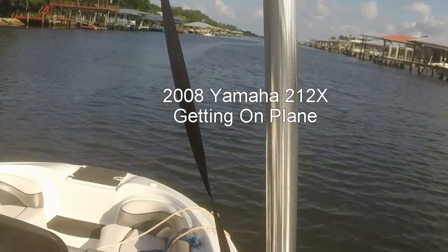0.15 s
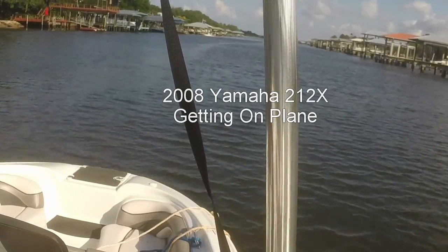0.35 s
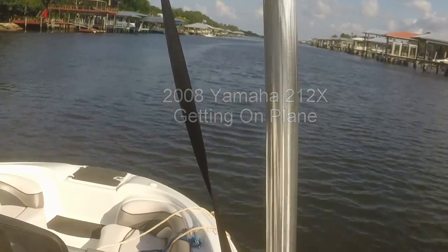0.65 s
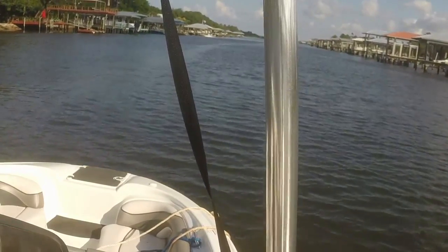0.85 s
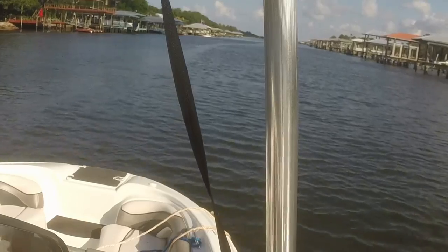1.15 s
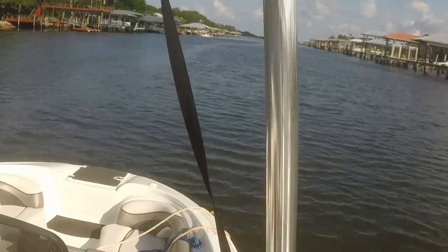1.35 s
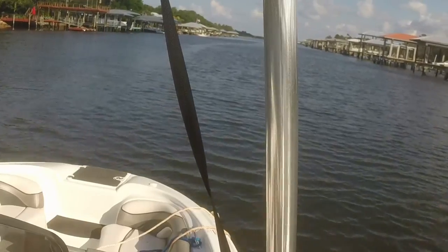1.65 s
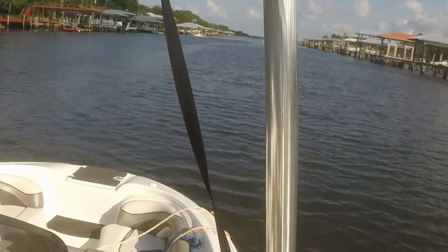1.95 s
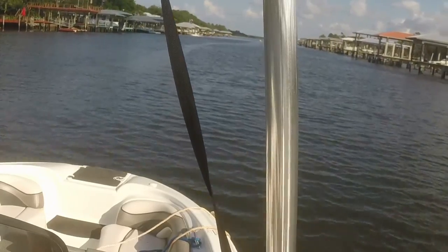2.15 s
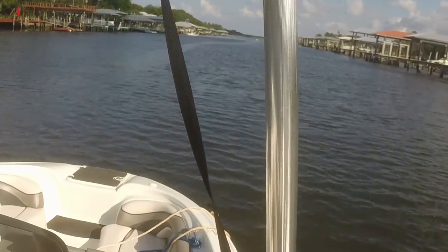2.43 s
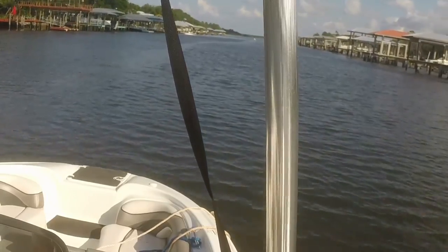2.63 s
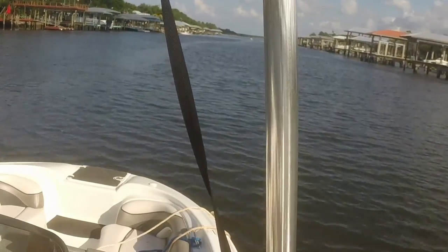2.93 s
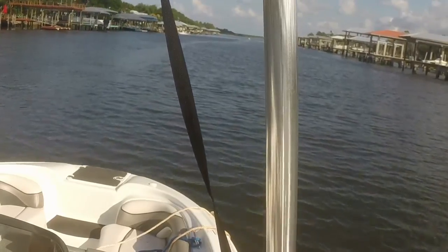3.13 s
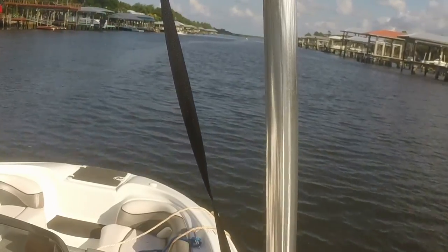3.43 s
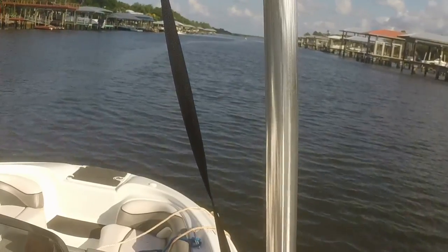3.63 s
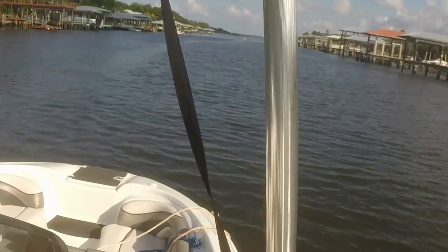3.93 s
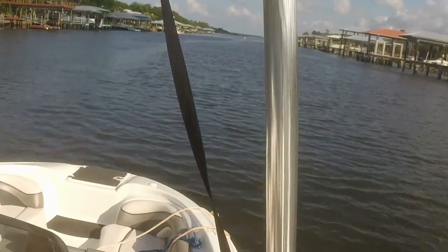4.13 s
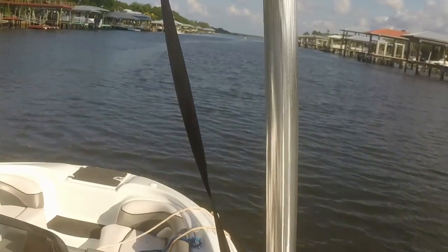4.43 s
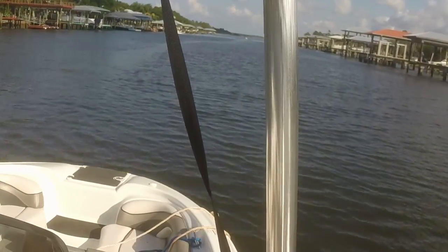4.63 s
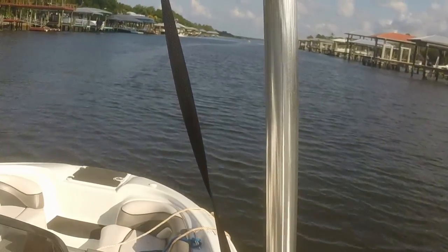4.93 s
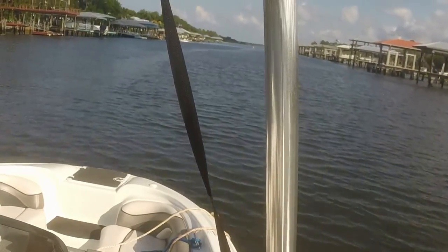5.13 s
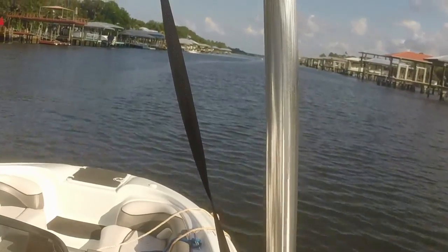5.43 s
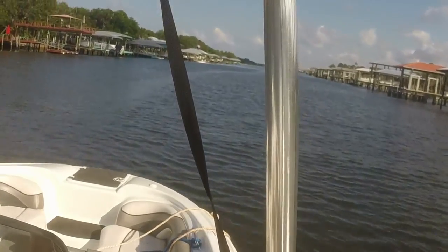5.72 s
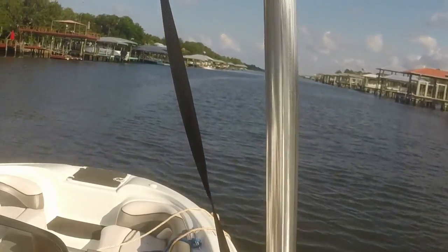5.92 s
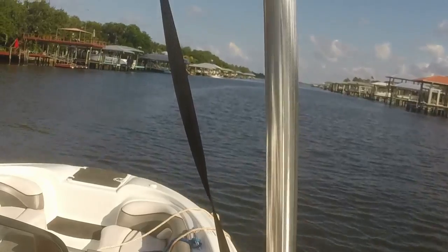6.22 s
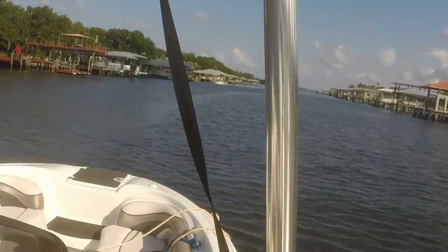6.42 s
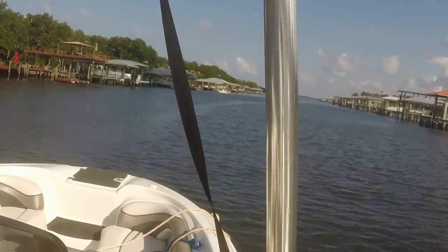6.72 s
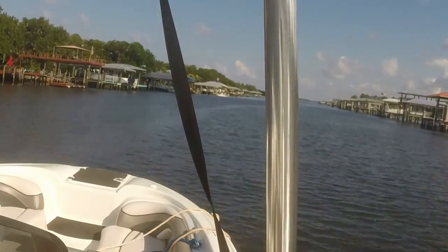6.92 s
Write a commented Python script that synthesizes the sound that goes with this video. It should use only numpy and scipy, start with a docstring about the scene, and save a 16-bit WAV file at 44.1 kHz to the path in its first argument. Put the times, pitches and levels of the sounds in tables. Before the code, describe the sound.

Two boat engines idle in a low, throbbing burble with faint whine and ticks, then rev up abruptly into a loud, climbing roar with rushing water.

```python
"""Twin-engine jet boat pulling away

A jet boat idles along a canal, heard from the helm; then the throttles open and it climbs onto plane.
Two four-cylinder engines at unequal speeds sound as sine orders, puffs and noise shaped by hull resonances.
A fuel pump whines as a surging sine and a loose fitting ticks at idle; as the bow lifts, gear rattles
in filtered clicks. Filtered noise is the water, lapping at idle and rushing once the throttles open."""
import sys
import numpy as np
from scipy.fft import rfft, irfft, next_fast_len
from scipy.io import wavfile
from scipy.ndimage import map_coordinates

SR = 44100
rng = np.random.default_rng(int(sys.argv[2]) if len(sys.argv) > 2 else 0)


def store_pcm(level_fs):
    """Save levels as 16-bit WAV."""
    pcm = np.round(np.clip(level_fs, -1, 1) * 32767).astype(np.int16)
    wavfile.write(sys.argv[1], SR, np.atleast_2d(pcm).T)


N = 311787

# loose gear shifting as the bow lifts: t/s, level/dB before make-up gain
RATTLE_HITS = [(5.2754, -34), (5.338, -46), (5.3945, -37), (5.4176, -43), (5.4507, -44), (5.466, -41.5),
               (5.5683, -39), (5.584, -30), (5.598, -38), (5.6421, -41), (5.6567, -31.5), (5.6754, -41.5),
               (5.7344, -44), (5.7543, -41), (5.7857, -48), (5.818, -36), (5.883, -32.5), (5.9185, -36.5),
               (5.9504, -45), (5.9748, -35.5), (6.26, -44), (6.2733, -43)]
PLANE_START_S, PLANE_TAKES_S = 5.61, 1.3  # the hull climbs out of the water


def amp(db):
    """Decibels to gain."""
    return 10 ** (np.asarray(db) / 20)


def unit(x):
    """Scale to rms 1."""
    return x / np.sqrt(np.mean(x ** 2) + 1e-20)


def seconds():
    """Time of every sample in seconds."""
    return np.arange(N) / SR


def curves(rows):
    """One value per sample for each column after the time."""
    s, *cols = np.transpose(rows)
    return [np.interp(seconds(), s, c) for c in cols]


def wobble(rate):
    """A smooth random curve, rate knots a second."""
    knots = rng.standard_normal(int(N * rate / SR) + 4)
    return map_coordinates(knots, [np.arange(N) * rate / SR])


def shape(points, hz):
    """Gain of (Hz, dB) points on a log-frequency axis."""
    f, db = np.transpose(points)
    return amp(np.interp(np.log(hz + 1), np.log(f + 1), db))


def hull(hz, leak_db=-34):
    """Gain of the hull: steep-sided resonances over a weak direct path that dulls with frequency."""
    # hull and engine bay resonances: f/Hz, width/Hz, level/dB
    resonances = [(89.7, 36, -3), (129.3, 37, -0.5), (210.1, 43, 0.5), (238.8, 44, -0.5), (270, 51, -8.5),
                  (353.5, 78, -17.5), (486.2, 24.6, -10.5), (508.8, 25, -10.5), (620.3, 28, -11),
                  (677, 69, -17), (787, 110, -23.5), (1021, 110, -24.5), (1130, 210, -29), (1552, 150, -22),
                  (1724, 99, -19), (1984, 450, -32), (2373, 270, -37.5), (3490, 550, -43.5)]
    power = amp(leak_db) ** 2 / (1 + (hz / 1000) ** 4)
    for centre, width, db in resonances:
        power = power + amp(db) ** 2 / (1 + (2 * (hz - centre) / width) ** 2) ** 2
    return np.sqrt(power)


def filtered(x, gain):
    """x through the causal, minimum-phase filter that has this gain as a function of frequency."""
    m = 2 * next_fast_len(N // 2 + SR // 4)
    log_gain = np.log(np.maximum(gain(np.fft.rfftfreq(m, 1 / SR)), 1e-6))
    cepstrum = irfft(log_gain, m)
    # folding the cepstrum forward in time makes the filter causal
    cepstrum[1:m // 2] *= 2
    cepstrum[m // 2 + 1:] = 0
    return irfft(rfft(x, m) * np.exp(rfft(cepstrum)), m)[:N]


def blend(idle, loaded, load):
    """Equal-power change from the idle sound to the loaded one."""
    return np.sqrt(1 - load) * idle + np.sqrt(load) * loaded


def through_hull(x, idle_colour, load_colour, load):
    """An engine source heard through the hull; its colour changes with load."""
    idle = unit(filtered(x, lambda hz: hull(hz) * shape(idle_colour, hz)))
    loaded = unit(filtered(x, lambda hz: hull(hz) * shape(load_colour, hz)))
    return blend(idle, loaded, load)


def line(turns, order, waver):
    """One engine order, near rms 1, wavering in strength and phase."""
    strength = amp(5.2 * waver * wobble(9))
    phase = 2 * np.pi * (order * turns + rng.random()) + waver * wobble(12)
    return np.sqrt(2) * strength * np.sin(phase)


def idle_left(speed):
    """Gain of the idle hum, which fades steeply as the revs rise."""
    return np.minimum(speed[0] / speed, 1) ** 8


def engine_notes(speeds, turns, load, planing, labour_db, exhaust_db):
    """Engine orders: clean at idle; under load coloured by the hull, wavering more before the climb."""
    # clean idle lines: multiple of the cycle rate, level/dB before the idle trim
    port_lines = [(2, -27), (10, -31), (12, -24), (14, -33)]
    starboard_lines = [(7, -32), (9, -33), (12, -29), (13, -27), (14, -24.5), (16, -29), (17, -37),
                       (18, -32), (21, -30), (30, -42)]
    # lines under load, before hull and exhaust level: multiple of the cycle rate, port level/dB,
    # starboard level/dB, growth/(dB per octave of revs), change on plane/dB
    pull = [(2, -8, -13, 0, 0), (3, -8, -6, 0, 0), (4, 2.5, -4, 0, 0), (5, -9, -12, 25, 2),
            (8, -7, 0, 25, 0), (10, -9, -9, 12, 0), (15, -3, -3, 20, 0), (16, -5, -4, 20, 0),
            (23, -7, -6, 0, -3)]
    strain_waver, settle_s = .27, .45  # orders steady over this time before the climb onto plane

    idle = 0
    for speed, turn, orders in zip(speeds, turns, (port_lines, starboard_lines)):
        hum = sum(amp(db) * line(turn, k, waver=.24) for k, db in orders)
        idle = idle + idle_left(speed) * hum

    grid = np.arange(SR // 16)  # Hz
    response = hull(grid)
    strain = np.clip((PLANE_START_S - seconds()) / settle_s, 0, 1)
    loaded = 0
    for k, port_db, starboard_db, growth, plane_db in pull:
        is_firing_note = k == 4  # four cylinders fire once each per cycle
        waver = .3 if is_firing_note else .14 + strain_waver * strain
        for speed, turn, db in zip(speeds, turns, (port_db, starboard_db)):
            swell_db = growth * np.log2(speed / speed[-1]) + plane_db * planing ** 2
            swell_db = swell_db + is_firing_note * labour_db
            hull_gain = np.interp(k * speed, grid, response)
            loaded = loaded + amp(db + swell_db) * hull_gain * line(turn, k, waver)
    return amp(-4.0) * idle + load * amp(exhaust_db - 1.63) * loaded


def drone(speeds, turns, load, idle_db=-16, load_db=-21, throb_db=1.2):
    """Paired deep notes beat as the engines drift in and out of step; idle throbs per starboard cycle."""
    # how far one deep note runs ahead of the other; they add at whole cycles, cancel most at halves:
    # t/s, lead/cycles
    lead_path = [(0, 0), (.3, .13), (.48, .27), (.58, .42), (.7, .54), (.85, .57), (.98, .52), (1.08, .72),
                 (1.6, .79), (2.1, .82), (2.3, .64), (2.5, .8), (2.7, .67), (2.85, .54), (3.03, .49),
                 (3.28, .76), (3.5, 1.08), (3.68, 1.28), (3.8, 1.56), (3.95, 1.77), (4.1, 1.86),
                 (4.33, 1.73), (4.5, 1.49), (5.3, 1.33), (6.3, 0.98), (6.55, 0.54), (6.66, 0.31),
                 (6.75, 0.41), (6.85, 0.1), (7.07, 0.3)]
    idle_note, load_note = 6, 1.285  # multiples of the port cycle rate
    weaker_db, waver_db = -2, .5
    lead, = curves(lead_path)

    def note(cycles):
        """A sine of rms 1."""
        return np.sqrt(2) * np.sin(2 * np.pi * cycles)

    def pair(order):
        """Two notes of one pitch, set apart in phase by the lead."""
        cycles = order * turns[0]
        return note(cycles - lead / 2) + amp(weaker_db) * note(cycles + lead / 2)

    throb = amp(idle_db + throb_db * note(turns[1]))
    idle = throb * idle_left(speeds[0]) * pair(idle_note)
    loaded = amp(load_db) * load ** 2 * pair(load_note)
    return amp(waver_db * wobble(12)) * (idle + loaded)


def overtone(trim_db=.5, fade_s=0.041):
    """A sine high in the idle hum comes and goes in level and pitch; it dies as the throttles open."""
    # the hum's upper overtone: t/s, f/Hz, level/dB before trim
    overtone_path = [(0.0, 236.9, -23), (0.43, 231.6, -28.5), (0.47, 237.7, -48), (0.53, 232.4, -26.5),
                     (0.78, 230.4, -35.5), (0.9, 232.5, -26), (1.33, 232.1, -34), (1.63, 233, -25.5),
                     (1.75, 229.3, -45), (1.87, 234.6, -24.5), (2.26, 235.1, -27.5), (2.32, 240, -49),
                     (2.38, 237.1, -24.5), (2.54, 238.7, -39.5), (2.59, 236.3, -24), (3.43, 232.5, -29),
                     (3.46, 233.7, -22), (3.76, 230.4, -31.5), (4.03, 236.2, -24.5), (4.25, 231.2, -29.5),
                     (4.29, 231.3, -17.5), (4.58, 230.2, -23)]
    hz, level_db = curves(overtone_path)
    after = np.maximum(seconds() - overtone_path[-1][0], 0)
    tone = line(np.cumsum(hz) / SR, 1, waver=.12)
    return amp(level_db + trim_db) * np.exp(-after / fade_s) * tone


def booms(waver=0.09):
    """Gliding tones swell and fade, as when an engine order slides through a hull resonance."""
    # hull booms: t/s at the crest, f/Hz, glide/(Hz per s), level/dB, rise/s, fall/s
    swells = [(3.52, 135, 0, -20, .09, .14), (4.61, 81, 30, -11.5, .055, .065),
              (4.75, 83, 30, -13, .04, .04), (4.68, 136, -30, -18, .09, .08),
              (4.86, 132, -5, -10.5, .09, .12), (4.86, 94, 0, -17, .03, .05),
              (5.02, 216, 260, -12, .04, .085), (5.4, 258, 60, -18, .09, .09), (4.9, 511, 0, -29, .04, .04),
              (5.0, 494, 0, -29, .03, .04), (5.02, 616, 60, -28, .05, .07),
              (5.16, 506, 120, -22.5, .05, .04), (5.28, 697, 0, -32, .05, .035),
              (5.3, 80, 0, -19, .05, .06), (5.6, 211, 0, -19, .04, .1), (6.96, 700, 0, -29, .05, .06),
              (4.88, 1720, 0, -42, .025, .03), (4.99, 1700, 0, -38, .03, .04),
              (5.22, 1710, 0, -36, .02, .02), (6.1, 1555, 0, -35, .02, .02),
              (6.29, 1555, 0, -32, .02, .025)]
    out = 0
    for s, hz, glide, db, rise, fall in swells:
        t = seconds() - s
        swell = np.exp(-(t / np.where(t < 0, rise, fall)) ** 2)
        cycles = hz * t + glide * t ** 2 / 2
        out = out + amp(db) * swell * line(cycles, 0.99, waver)  # pitch and glide land 1 % low
    return out


def singing(turns):
    """Three engine orders ring out clean, as on the hull's sharp resonances near 500 and 620 Hz."""
    # singing orders: t/s, port 7th level/dB, port 9th level/dB, starboard 7th level/dB
    voice_levels = [(4.7, -100, -100, -100), (5.3, -49, -64, -59.5), (5.45, -40, -52, -61),
                    (5.6, -27, -34.5, -57), (6, -28, -28.5, -50), (6.27, -23, -25.5, -37),
                    (6.34, -26, -43, -30), (6.43, -19.5, -50, -28), (6.55, -24.5, -56, -24),
                    (6.7, -27, -55, -21.5), (6.85, -20.5, -56, -20), (7.07, -26.5, -55, -22.5)]
    voices = [(turns[0], 7), (turns[0], 9), (turns[1], 7)]
    levels = curves(voice_levels)
    return sum(amp(db) * line(turn, k, waver=.1) for (turn, k), db in zip(voices, levels))


def firings(speed, turns, scatter, count=4):
    """One exhaust puff per cylinder, of very uneven size and slightly uneven timing."""
    at = np.flatnonzero(np.diff(np.floor(count * turns)))
    size, late = rng.standard_normal((len(at), 2)).T
    interval = SR / (count * speed[at])  # samples between firings
    when = np.clip(at + .12 * late * interval, 0, N - 1).astype(int)
    return unit(np.bincount(when, (1 + scatter * size) / np.sqrt(speed[at]), N))


def exhaust(speeds, turns, load, exhaust_db):
    """Uneven puffs burble out amid the noise of the churning water at the stern."""
    # exhaust colour at idle and under load: f/Hz, level/dB
    idle_colour = [(15, -21), (30, 0), (60, 1.5), (100, -9), (160, 0), (205, -4.5), (238, -8), (275, -11),
                   (365, -4.5), (500, -15), (700, -31), (1500, -54)]
    load_colour = [(20, -12), (60, -7), (130, -11.5), (180, 3.5), (240, -4.5), (365, -2), (500, -7),
                   (700, -25.5), (1500, -47.5)]
    puffs = unit(sum(firings(speed, turn, scatter=0.93) for speed, turn in zip(speeds, turns)))
    churn = amp(2.5) * rng.standard_normal(N)
    return amp(exhaust_db) * through_hull(puffs + churn, idle_colour, load_colour, load)


def machinery(turns, load, planing, throb=0.21):
    """Intake and valve noise pulses per crank turn, rasps at the firing rate and opens up on plane."""
    # engine bay colour at idle, under load and on plane: f/Hz, level/dB
    idle_colour = [(150, -30), (400, -2), (520, -3), (615, -10), (690, 0), (790, 4), (1050, -1), (1350, 1),
                   (1550, -6), (2200, 1), (3300, 4), (4500, 0), (12000, -30)]
    load_colour = [(150, -32.5), (380, -1), (500, -6), (615, -3.5), (700, -0.5), (1050, 0), (1450, -2.5),
                   (1720, -6.5), (2200, 0), (3400, -5), (4400, -10), (12000, -51)]
    plane_colour = [(150, -32), (380, 0), (500, -7), (615, -6.5), (700, 0), (1050, 1.5), (1450, -4),
                    (1720, -9.5), (2200, 0.5), (3400, -0.5), (4400, -6), (12000, -47)]
    # roar of the engine bay as the throttles open: t/s, level/dB
    roar_path = [(0, -45), (4.5, -46), (4.76, -41), (4.88, -35), (5.0, -31), (5.25, -27), (5.5, -29),
                 (6.0, -32.5), (6.3, -29.5), (6.6, -29.5), (7.07, -25.5)]

    rasp = .45 * load
    gate = 0
    for turn in turns:
        crank_pulse = throb * np.cos(2 * np.pi * 2 * turn)  # two crank turns per cycle
        firing_pulse = rasp * np.cos(2 * np.pi * 4 * turn)
        gate = gate + np.exp(crank_pulse + firing_pulse)
    roughness = amp(0.37 * wobble(16) + .8 * load * wobble(110))
    noise = gate * roughness * rng.standard_normal(N)
    on_plane = unit(filtered(noise, lambda hz: hull(hz) * shape(plane_colour, hz)))
    before_plane = through_hull(noise, idle_colour, load_colour, load)
    roar_db, = curves(roar_path)
    return amp(roar_db) * blend(before_plane, on_plane, planing)


def fuel_pump(turn, load, swing_hz=75, sag_db=10, trim_db=0.5, lag=0.056):
    """A thin sine whine surges in pitch and strength once per engine cycle, and sags in between."""
    # the whine at the crest of its surges: t/s, f/Hz, level/dB before trim
    crests = [(0.1, 1670, -48), (.25, 1705, -46), (.44, 1700, -52), (.72, 1710, -45.5), (1.07, 1675, -51),
              (1.33, 1725, -44.5), (1.6, 1715, -45), (1.78, 1690, -52), (1.97, 1670, -49),
              (2.12, 1725, -46), (2.27, 1705, -50), (2.6, 1700, -48.5), (2.88, 1715, -45),
              (2.99, 1660, -53), (3.1, 1645, -48), (3.2, 1670, -55), (3.4, 1690, -54), (3.5, 1720, -46),
              (4, 1720, -45), (4.11, 1700, -51), (4.4, 1710, -47), (4.6, 1745, -46), (4.9, 1760, -52)]
    crest_hz, crest_db = curves(crests)
    sag = (1 - np.sin(2 * np.pi * (turn - lag) + .25 * wobble(6))) / 2  # 0 at the crest, 1 at the sag
    pitch = crest_hz - swing_hz * sag + 18 * wobble(160)
    level_db = crest_db + trim_db - sag_db * sag + 1.2 * wobble(45)
    return amp(level_db) * np.sqrt(1 - load) * np.sin(2 * np.pi * np.cumsum(pitch) / SR)


def contacts(events, colour, t60, db, ring_db, delay_s):
    """Sharp clicks of one colour, each with a brief, decaying noisy ring."""
    t = np.arange(SR // 20) / SR
    out = np.zeros(N + len(t))
    for s, peak_db in events:
        ring = amp(ring_db - 60 * t / t60) * rng.standard_normal(len(t))
        click = (t == 0) + ring
        out[round((s + delay_s) * SR):][:len(t)] += amp(peak_db + db) * click
    return filtered(out[:N], lambda hz: shape(colour, hz))


def fitting():
    """Idle vibration taps a loose fitting in short runs: dry clicks with hardly any ring."""
    # taps: t/s, level/dB before make-up gain
    taps = [(0.0787, -42), (0.178, -45), (0.216, -42), (0.257, -43), (0.2811, -44), (0.3326, -41.5),
            (0.37, -41), (0.5008, -47), (1.2445, -41.5), (1.284, -41), (1.3346, -42.5), (1.4374, -39.5),
            (1.552, -42), (1.6523, -40.5), (2.0332, -42), (2.0851, -41), (2.186, -39), (2.593, -43),
            (3.385, -41), (3.4224, -42), (3.4607, -42.5), (3.4988, -41), (3.5243, -42.5), (3.576, -39.5),
            (3.6137, -39), (3.6528, -39.5), (3.7312, -43), (4.0279, -40), (4.2823, -41)]
    # colour of a tap: f/Hz, level/dB
    tick_colour = [(800, -19), (2200, 3.5), (3400, 6), (4300, -7.5), (7000, -17), (14000, -34.5)]
    return contacts(taps, tick_colour, t60=0.0085, db=19.5, ring_db=-21, delay_s=0.00081)


def chatter(db=-49, count=30):
    """Small contacts at random among the larger clacks while the bow lifts."""
    when, size = rng.random((count, 2)).T
    first, last = RATTLE_HITS[0][0], RATTLE_HITS[-1][0]
    return np.transpose([first + (last - first) * when, db + 4 * np.log(size + .01)])


def gear():
    """Loose gear clacks, each hit landing again more softly, amid smaller chatter as the bow lifts."""
    # colour of a clack: f/Hz, level/dB
    clack_colour = [(1500, -14.5), (3000, 8.5), (3700, 4.5), (4400, 3.5), (5100, 0.5), (5700, -4.5),
                    (7000, -16), (9000, -19.5), (10500, -27.5), (13000, -42)]
    bounce_s, bounce_db = .0045, -7  # mean flight time; the second landing is softer
    flights = bounce_s * (.7 + .6 * rng.random(len(RATTLE_HITS)))
    bounces = [(s + flight, db + bounce_db) for (s, db), flight in zip(RATTLE_HITS, flights)]
    hits = list(RATTLE_HITS) + bounces
    clacks = contacts(hits, clack_colour, t60=0.017, db=13.0, ring_db=-13.5, delay_s=0.00087)
    small = contacts(chatter(), clack_colour, t60=.012, db=13, ring_db=-15.5, delay_s=0)
    return clacks + small


def wash(load):
    """Water along the hull: finely fluctuating noise, lapping at idle, rushing once the throttles open."""
    # colour of the hiss at idle and under load: f/Hz, level/dB
    idle_colour = [(1200, -8), (3300, 3), (4400, -5), (5100, -6), (5700, -4), (7400, -8), (8400, -12.5),
                   (9500, -11), (12000, -16.5), (15500, -28)]
    load_colour = [(1500, -15.5), (3400, 9), (4400, -1.5), (5100, -5), (5900, -1.5), (6800, -9.5),
                   (7400, -7), (8400, -14.5), (9500, -13), (11500, -23), (15500, -41.5)]
    # water level: t/s, level/dB
    water_path = [(0, -57.5), (.4, -61), (.75, -63.5), (1.1, -63.5), (1.4, -61.5), (2.35, -62),
                  (2.58, -59.5), (3.15, -62.5), (3.5, -61.5), (4.7, -62), (5.45, -59.5), (5.7, -60),
                  (6.15, -57), (6.65, -53), (6.95, -48), (7.07, -50.5)]
    fizz = rng.standard_normal(N) * amp(1.8 * wobble(700) + .6 * wobble(18))
    slow = unit(filtered(fizz, lambda hz: shape(idle_colour, hz)))
    fast = unit(filtered(fizz, lambda hz: shape(load_colour, hz)))
    water_db, = curves(water_path)
    return amp(water_db) * blend(slow, fast, load)


def scene():
    """Engine speed, load and the climb onto plane steer the mix of engines, gear and water."""
    # four-stroke cycle rates: t/s, port f/Hz, starboard f/Hz
    cycle_rates = [(0, 13.08, 9.8), (4.5, 13.1, 9.8), (4.76, 31.5, 27), (4.9, 34.5, 32.5), (4.97, 51.5, 48),
                   (5.08, 58, 54.5), (5.22, 63.2, 59), (5.55, 67.2, 63), (6.2, 68.2, 64.4),
                   (6.25, 69.1, 65), (6.31, 71.3, 66.4), (6.52, 72.8, 69.2), (7.07, 73.6, 69.9)]
    # throttle: t/s, share of full load (0-1), extra level/dB on the firing note as the engines labour
    load_path = [(0, 0.04, -0.5), (4.5, 0.06, -1.5), (4.68, 0.5, 5.5), (4.85, 0.67, 0.5), (5.0, 0.91, -0.5),
                 (5.4, 0.94, 6), (5.7, 0.92, 2.5), (7.07, 0.99, 10)]
    speeds = curves(cycle_rates)
    turns = [np.cumsum(speed) / SR for speed in speeds]  # cycles so far
    load, labour_db = curves(load_path)
    load = np.clip(load, 0, 1)
    planing = np.clip((seconds() - PLANE_START_S) / PLANE_TAKES_S, 0, 1)
    exhaust_db = -26 + 9 * load - 2 * planing  # idle, change at full load, change on plane

    notes = drone(speeds, turns, load) + overtone() + booms() + singing(turns)
    notes = notes + engine_notes(speeds, turns, load, planing, labour_db, exhaust_db)
    bay = machinery(turns, load, planing) + fuel_pump(turns[1], load) + fitting()
    mix = notes + exhaust(speeds, turns, load, exhaust_db) + bay + wash(load) + gear()
    return mix[None]


def record(dry, top_hz=15600):
    """A steep band limit removes everything from top_hz up."""
    m = next_fast_len(N + SR // 4)
    keep = np.fft.rfftfreq(m, 1 / SR) < top_hz
    return irfft(rfft(dry, m) * keep, m)[:, :N]


dry = scene()
out = record(dry)
store_pcm(out)
```